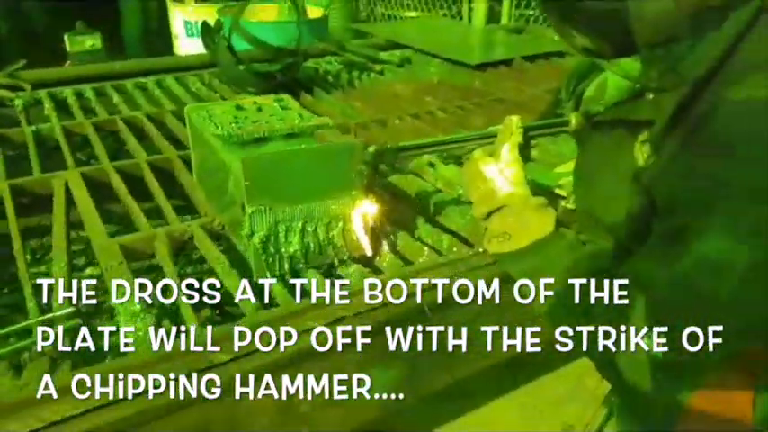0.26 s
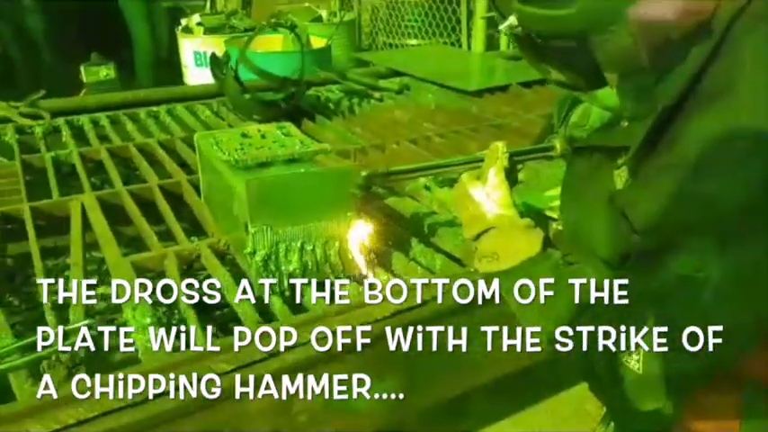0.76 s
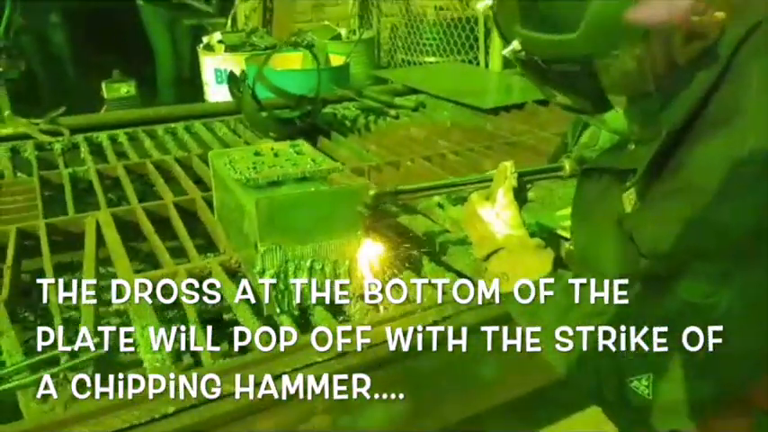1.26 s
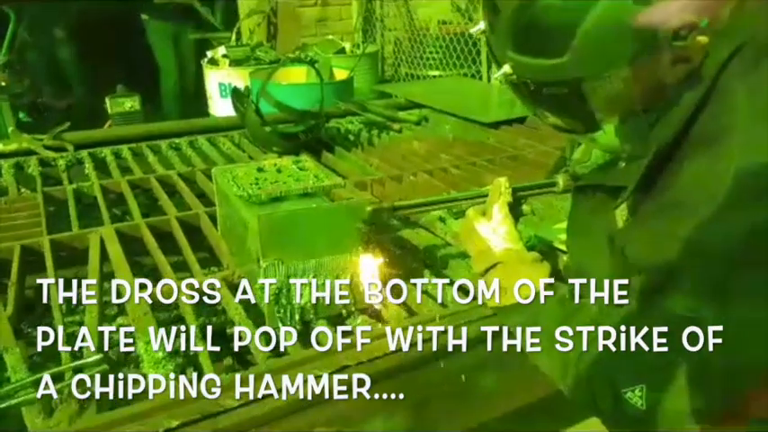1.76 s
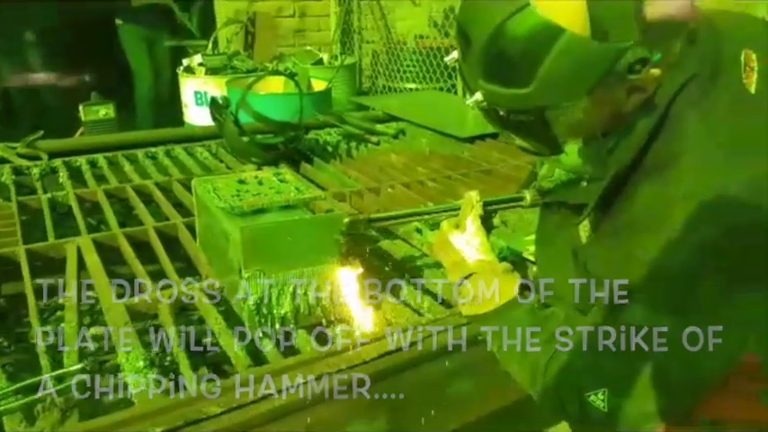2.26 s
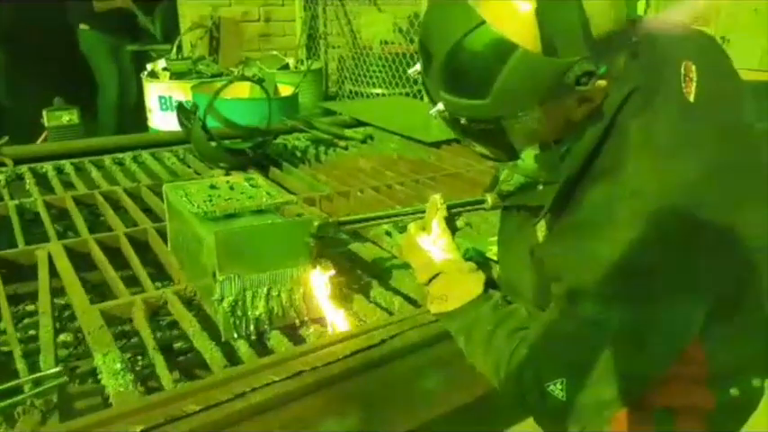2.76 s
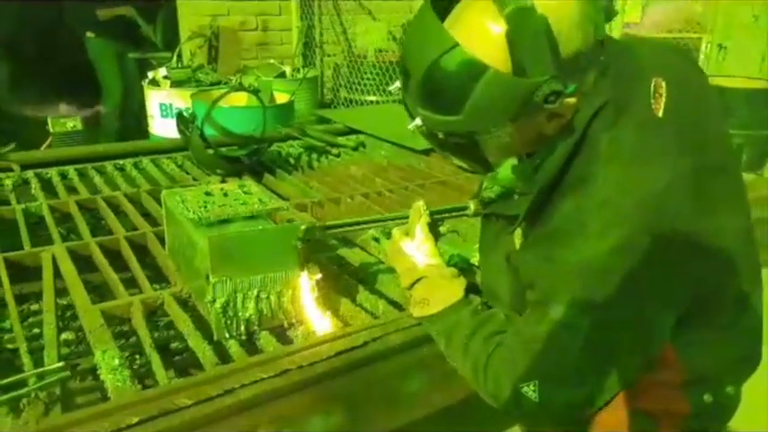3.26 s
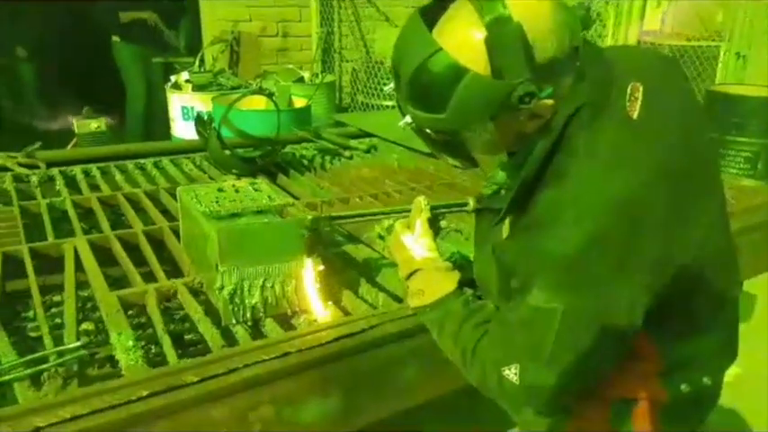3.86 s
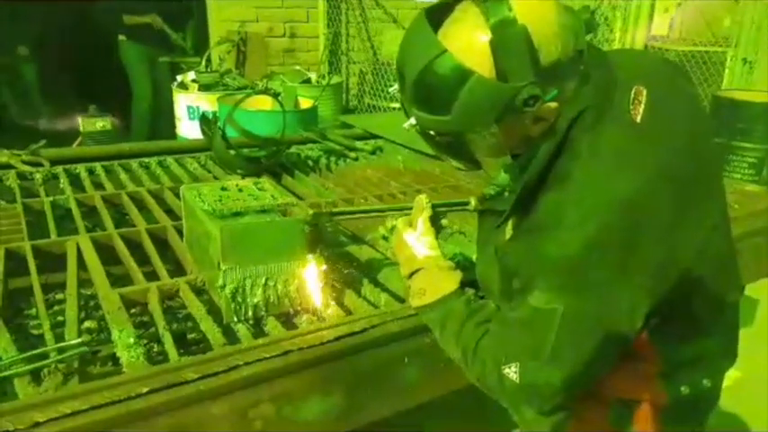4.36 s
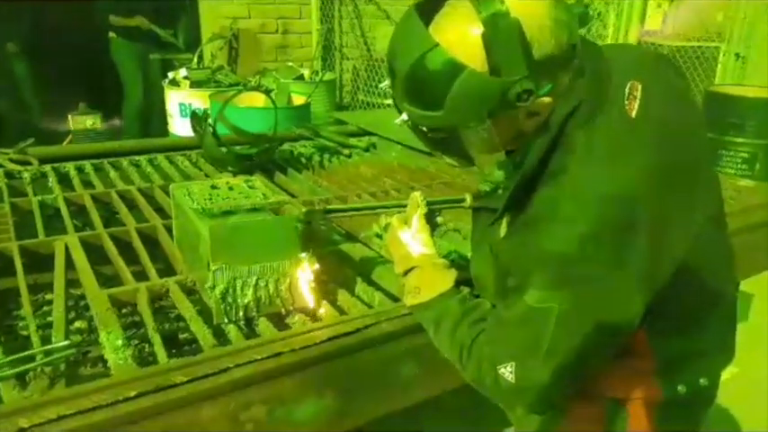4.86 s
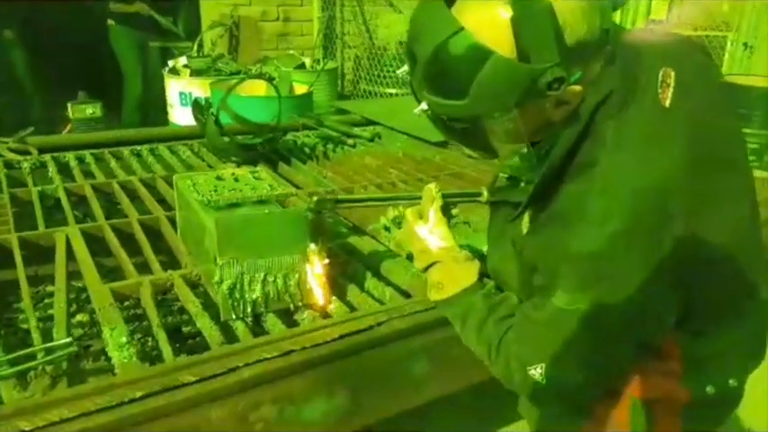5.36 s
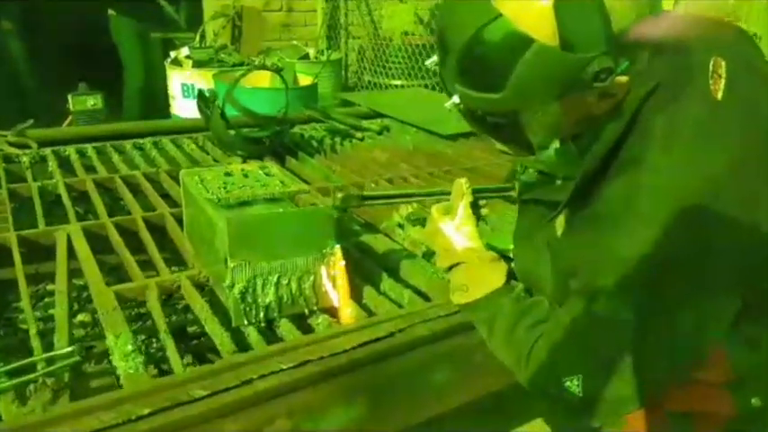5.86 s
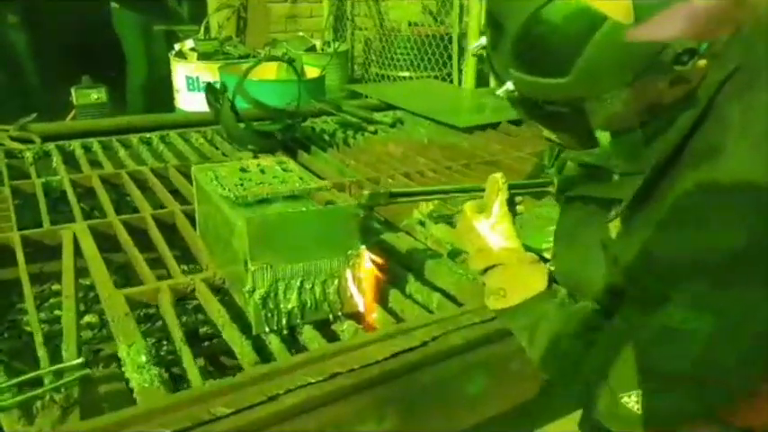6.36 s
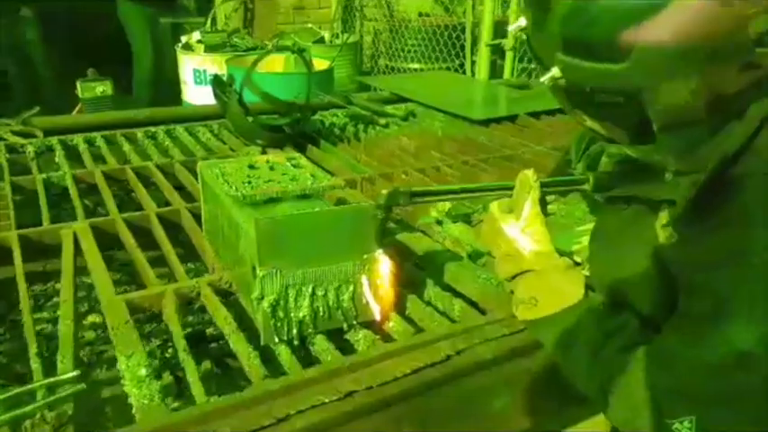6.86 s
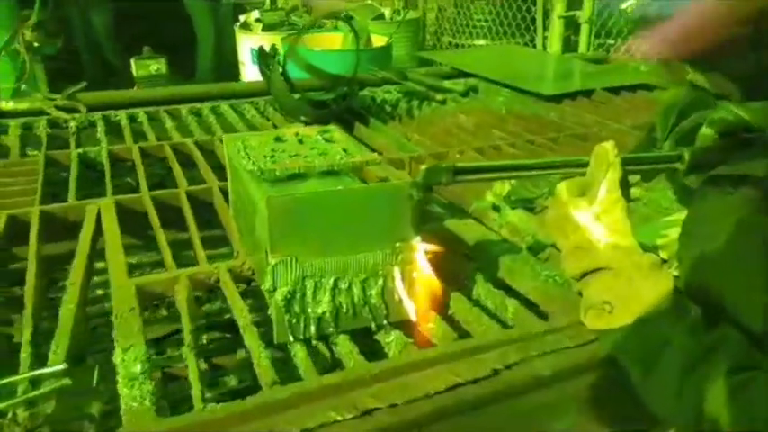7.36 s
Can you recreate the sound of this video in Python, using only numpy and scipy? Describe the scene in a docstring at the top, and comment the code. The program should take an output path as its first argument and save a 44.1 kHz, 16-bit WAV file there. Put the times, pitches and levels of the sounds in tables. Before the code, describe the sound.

From the start, a nearby gas torch cuts a steel block in a workshop, making a loud, bright, rushing hiss with a fine sputter. A half-whistling ring and a faint thin note run through it, over a low rumble that flares briefly at about 0.7 and 1.3 seconds. The jet is strongest from around 2.5 to 3.7 seconds, with two short high whistles near 3 seconds, slightly to the left. It then turns hollower and eases a little. At about 5.2 seconds the cutting jet shuts off abruptly, leaving a much quieter, airy flame. From roughly 5.7 seconds the flame swells against the steel into a low roar with hiss. Thin, high whistles at several pitches overlap, fading in and out, with a brief brighter one near 7.3 seconds. The flame is still roaring at the end, around 7.6 seconds.

```python
"""In a workshop, on a slatted table, an oxyacetylene torch cuts a steel block.
The turbulent oxygen jet hisses through the kerf and excites its air resonances; the sound turns
hollow by interference as the welder leans in. Once the lever is let go, only the preheat flame
burns: it roars against the steel, and thin edge tones come and go as the tip moves."""
import sys
import numpy as np
from scipy import signal
from scipy.fft import rfft, irfft, next_fast_len
from scipy.io import wavfile
from scipy.ndimage import map_coordinates

SR = 44100
rng = np.random.default_rng(int(sys.argv[2]) if len(sys.argv) > 2 else 0)


def generate_wav(sig):
    """Save sig (samples, or channels by samples) to the path in sys.argv[1] as 16-bit PCM at SR."""
    pcm = np.round(np.clip(np.atleast_2d(sig).T, -1, 1) * 32767).astype(np.int16)
    wavfile.write(sys.argv[1], SR, pcm)


N = 336042
BAND_LIMIT_HZ = 15520

# Strength of the jet in the kerf and at the tip: time_s, rush_db, hiss_db
JET_LEVELS = [(0.0, -28, -24.5), (0.45, -26, -25.5), (0.7, -24.5, -27), (0.9, -28, -28), (1.35, -25, -30),
              (1.85, -29.5, -28), (2.45, -21.5, -28.5), (2.7, -23.5, -24), (2.92, -23, -22.5),
              (3.15, -22.0, -28), (3.6, -22.0, -29.5), (4.085, -26, -27), (4.12, -31, -28.5),
              (4.33, -29.5, -31), (4.4, -29.0, -26), (4.9, -33, -31.5), (5.04, -29, -29.5),
              (5.14, -28, -39)]
# The jet's shrill band: time_s, centre_hz, level_db
SHRILL_BAND = [(0.0, 8600, -32.5), (1.36, 8750, -31.5), (1.79, 8680, -36.5), (2.1, 8400, -29),
               (2.83, 8160, -32.5), (3.75, 8650, -29.5), (3.9, 9050, -33.5), (4.3, 8900, -37),
               (5.1, 8500, -38)]
# The half-whistling ring of the cut: time_s, centre_hz, level_db
CUT_RING = [(0.0, 2740, -38), (0.65, 2680, -29), (1.0, 2720, -32), (1.35, 2717, -30.5), (1.72, 2720, -31),
            (1.82, 2720, -41), (2.22, 2734, -30.5), (2.5, 2764, -25), (2.85, 2816, -33.5),
            (3.15, 2798, -33), (3.55, 2783, -26.5), (4.09, 2760, -32.5), (4.14, 2760, -33.5),
            (4.85, 2765, -37.5), (5.12, 2740, -32)]
# Spectra of the jet's rush and hiss: frequency_hz, density_db
JET_RUSH_SPECTRUM = [(300, -57), (520, -16), (760, -3), (980, -7), (1250, 0.5), (1750, -1.5), (1930, -1),
                     (2200, 1.5), (2500, 2.5), (3150, 4.5), (3550, -1.5), (3900, -0.5), (4550, -2),
                     (5500, -0.5), (7100, -3.5), (9500, -5)]
JET_HISS_SPECTRUM = [(2500, -17), (4000, -6.5), (5500, -6.5), (7100, -4), (7550, -12), (9000, -0.5),
                     (9900, -1), (10800, 1), (13200, 3.5), (15000, 5.5), (16000, -5)]
def cutting_jet(hiss_pan_db):
    """Jet turbulence radiates broadband noise and drives the kerf; molten slag makes it sputter."""
    rush_db, hiss_db = curves(JET_LEVELS)
    shrill_hz, shrill_db = curves(SHRILL_BAND)
    ring_hz, ring_db = curves(CUT_RING)
    sputter_db = .35 * wobble(22) + .3 * wobble(70)
    kerf = kerf_resonances(rush_db)
    ring = amp(ring_db + 0.88 * wobble(24.97)) * panned(-6.5) * resonance(ring_hz, width_hz=74)
    rush_gain = amp(2.5 + 1.24 * wobble(48))
    rush = rush_gain * turbulence(JET_RUSH_SPECTRUM, echo_share=1.0, patch_hz=191, patch_s=0.78)
    hiss_gain = amp(hiss_db + 3.0 + 1.05 * wobble(32)) * panned(hiss_pan_db)
    hiss = hiss_gain * turbulence(JET_HISS_SPECTRUM, echo_share=0.82, patch_hz=345, patch_s=0.22)
    shrill_gain = amp(shrill_db + 3.5 + 1.14 * wobble(30)) * panned(2.7)
    shrill = shrill_gain * resonance(shrill_hz + 50 * wobble(9), width_hz=480)
    return amp(sputter_db) * (amp(rush_db) * (rush + kerf) + ring + hiss + shrill)


# Air modes in the kerf and under the block:
# centre_hz, width_hz, level_db, rush_slope (dB per dB), hollow_slope (dB per dB), pan_db
KERF_MODES = [(595, 88, -10, 0.05, 0.77, -0.5), (1242, 64, -17.5, 0, 0.7, -19),
              (1464, 73, -11, 0.15, 0.4, -21), (2208, 75, -18.5, -1, -0.5, 0),
              (2443, 47, -10.5, 1.1, 1.5, 6), (4030, 120, -12, -0.5, 0, 4), (4920, 220, -19, 1.9, -0.5, 17),
              (5386, 170, -13.5, -1, 1.3, 6), (6375, 290, -16, -0.5, 0.5, -2)]
# How strongly the space under the block rings: time_s, hollow_db
HOLLOWNESS = [(0.0, -5), (0.65, -2), (2.6, -2.5), (3.2, -0.5), (3.75, 1.5), (4.1, -2), (5.1, -2)]
def kerf_resonances(rush_db):
    """Cavity resonance: a harder rush favours some air modes, a softer one others."""
    hollow_db = curves(HOLLOWNESS)[0] + flare_db() / 2
    drive_db = rush_db + 25  # excess over the usual rush of -25 dB
    modes = 0
    for hz, width_hz, level_db, rush_slope, hollow_slope, pan_db in KERF_MODES:
        mode_db = level_db + rush_slope * drive_db + hollow_slope * hollow_db + 1.3 * wobble(30)
        modes += amp(mode_db) * panned(pan_db) * resonance(hz, width_hz)
    return modes


# Bands that fade or swell as the welder leans over the jet: centre_hz, width_hz, change_db
INTERFERENCE_BANDS = [(3560, 200, -3.5), (5300, 600, 3), (5860, 260, -9), (6300, 630, 4.5), (7200, 260, -4),
                      (9900, 450, -5)]
def lean_interference(jet):
    """Interference: as the welder leans in, sound paths cancel in some bands and add in others."""
    change = sum((amp(db) - 1) * signal.lfilter(*signal.iirpeak(hz, hz / width_hz, fs=SR), jet)
                 for hz, width_hz, db in INTERFERENCE_BANDS)
    return jet + swell(3.8, np.inf, fade_s=1.7) * change


FREE_AIR_RUSH_DB, FREE_AIR_HISS_DB = -45.5, -39.5
# What the flame adds as it plays on the steel: time_s, rush_db, hiss_db
FLAME_ON_STEEL = [(5.23, -50, -62), (5.64, -46.5, -57), (5.74, -40.5, -42), (5.87, -39.5, -40),
                  (6.36, -37, -36), (6.93, -33, -28), (7.38, -39.5, -34.5), (7.6, -38, -35)]
# Spectra of the flame's rush and hiss: frequency_hz, density_db
FLAME_RUSH_SPECTRUM = [(400, -11.5), (600, 9.5), (800, -3), (1200, 2), (2300, 1), (2700, 4), (3200, -0.5),
                       (3600, -4), (4150, -2), (5300, -25)]
FLAME_HISS_SPECTRUM = [(3000, -31), (4300, 3), (5400, 6), (6100, 0.5), (6600, 5.5), (7700, 4), (8850, 10),
                       (9400, 3), (10500, 5.5), (11800, 8), (12900, 7.5), (15400, 10)]
# Airy bands of the flame on the block's edge: start_s, end_s, centre_hz, width_hz, level_db, pan_db
EDGE_BANDS = [(5.1, 7.8, 1265, 90, -49.5, -7), (5.2, 6.6, 6030, 70, -48, -2),
              (6.698, 7.75, 4315, 60, -41, -5), (6.75, 7.25, 11860, 170, -36, 5),
              (6.55, 7.2, 8400, 50, -45, 2), (6.55, 7.1, 9630, 45, -45, 2)]
def preheat_flame(hiss_pan_db):
    """Incoherent sources add in power: the free flame's noise plus that of its impact on the steel."""
    rush_db, hiss_db = curves(FLAME_ON_STEEL)
    rush_level = np.hypot(amp(FREE_AIR_RUSH_DB), amp(rush_db + 5.5))
    hiss_level = np.hypot(amp(FREE_AIR_HISS_DB), amp(hiss_db + 1.0))
    rush = rush_level * turbulence(FLAME_RUSH_SPECTRUM, echo_share=1.0, patch_hz=120, patch_s=1.14)
    hiss_gain = hiss_level * amp(1.2 * wobble(12)) * panned(hiss_pan_db)
    hiss = hiss_gain * turbulence(FLAME_HISS_SPECTRUM, echo_share=1.0, patch_hz=150, patch_s=0.85)
    edge = sum(amp(db) * swell(start_s, end_s, fade_s=0.22) * panned(pan_db) * resonance(hz, width_hz)
               for start_s, end_s, hz, width_hz, db, pan_db in EDGE_BANDS)
    tones = (hiss_level / amp(FREE_AIR_HISS_DB)) ** 0.54 * tip_tones()  # 0.54 dB per dB of hiss
    return amp(0.93 * wobble(11)) * (rush + hiss + edge + tones)


# Loud whistles of the tip: start_s, end_s, pitch_hz, level_db, pan_db, stereo_phase_rad
TIP_WHISTLES = [(2.87, 3.017, 4195, -29, -10, 1.4), (3.12, 3.29, 4195, -29, -13, 1.4),
                (5.69, 6.2, 2789, -38.5, -14, 2.2), (6.12, 6.38, 2789, -36, -1, 2.6),
                (6.02, 6.7, 3025, -42, -12, 2), (5.9, 6.7, 4035, -44, -6, 2.1),
                (5.95, 6.4, 11693, -42, 12, 1.5), (6.04, 6.7, 8694, -38.5, 0, 0.4),
                (6.005, 6.085, 6056, -37.5, 4, 0.2), (6.18, 6.55, 6056, -31, 10, 0.2),
                (6.58, 6.97, 5150, -35.5, 0, 0.3), (6.68, 7.3, 4198, -35.5, -16, 0.86),
                (6.68, 7.18, 4167, -33.5, -13, 0.6), (7.27, 7.45, 4195, -30.5, -2, 1.65),
                (6.7, 7.1, 4496, -40, -14, 0.8), (6.68, 7.3, 6175, -38.5, 1, 1.7),
                (6.7, 7.2, 7230, -44, 9, 2.3), (6.7, 7.7, 9400, -45, 4, 1.5),
                (6.75, 7.52, 11090, -38.5, 2.5, 1.3), (7.21, 7.38, 11100, -31.5, 1, 1.8),
                (6.75, 7.5, 5580, -44, -1, 1.3), (7.26, 7.8, 4800, -39, 4, 0.4),
                (7.24, 7.8, 5135, -43, 3, 0.5)]
def tip_whistles():
    """Flow feedback: as the torch moves, edge tones take hold and give way, the long ones slowly."""
    whistles = 0
    for start_s, end_s, hz, level_db, pan_db, phase_rad in TIP_WHISTLES:
        envelope = swell(start_s, end_s, fade_s=0.66 * (end_s - start_s))
        tone = edge_tone(hz, stray_hz=7.0, airy_db=-4.0, stereo_phase_rad=phase_rad)
        whistles += amp(level_db) * envelope * panned(pan_db) * tone
    return whistles


# Strength of the burning gas's roar: time_s, level_db
ROAR_LEVELS = [(0.0, -39), (2.0, -40.5), (2.22, -37), (3.86, -38), (4.18, -43.5), (4.79, -47.5),
               (5.42, -44), (5.85, -34), (7.09, -34), (7.58, -30.5)]
# Spectrum of the roar: frequency_hz, density_db
ROAR_SPECTRUM = [(12, -48), (20, -17), (91, -1), (129, 1), (255, 1), (310, -3.5), (410, -4), (550, -3),
                 (800, -8.5), (1040, -22.5), (1760, -120)]
def combustion_roar():
    """Combustion noise: burning gas rumbles against the steel, nearly alike on both sides."""
    roar_db, = curves(ROAR_LEVELS)
    rumble = turbulence(ROAR_SPECTRUM, echo_share=0.31, patch_hz=200, patch_s=0.23)
    return amp(roar_db + 1.5 + flare_db()) * rumble


# Brief flares of the flame: time_s, boost_db
FLAME_FLARES = [(0.71, 6), (1.31, 5), (3.26, 1.5), (5.97, 2.5)]
def flare_db(half_length_s=0.062):
    """Unsteady burning: each flare lifts the level in a Gaussian pulse."""
    return sum(db * np.exp(-((clock() - time_s) / half_length_s) ** 2) for time_s, db in FLAME_FLARES)


# Swell and ebb of the gas tone: time_s, level_db
GAS_TONE_LEVELS = [(0.0, -48), (1.25, -45), (1.38, -43), (1.7, -44), (1.85, -56), (2.2, -53), (2.62, -36),
                   (3.0, -46), (5.17, -51.5), (5.26, -47), (5.42, -45), (5.47, -53), (5.61, -54),
                   (5.71, -45), (5.85, -50), (6.15, -54), (6.35, -40.5), (6.62, -39), (6.75, -47)]
def gas_tone():
    """Flow-induced oscillation: gas passing through the torch sings one thin, fairly clean note."""
    level_db, = curves(GAS_TONE_LEVELS)
    return amp(level_db) * panned(-3) * edge_tone(hz=1828, stray_hz=4, airy_db=-7)


# Faint tones of the tip with the flame in free air: pitch_hz, level_db, pan_db
FAINT_TONES = [(4204, -49.5, -5), (4520, -56, -3), (4790, -53, -2), (6130, -49.5, 4), (8915, -50.5, -2),
               (11105, -54, 0)]
def tip_tones(drift_db=1.3):
    """Weak edge tones, more air noise than pitch, each drift in level independently."""
    return sum(amp(db + drift_db * wobble(3.6)) * panned(pan_db)
               * edge_tone(hz, stray_hz=10.97, airy_db=5.0) for hz, db, pan_db in FAINT_TONES)


def edge_tone(hz, stray_hz, airy_db, stereo_phase_rad=1.2):
    """Self-sustained oscillation: a core of straying pitch in a skirt of air noise, rms near 1."""
    phase = 2 * np.pi * np.cumsum(hz + stray_hz * wobble(30)) / SR
    offset = stereo_phase_rad + wobble(1.976) / 3  # the path difference to the microphones drifts
    core = unit(np.cos([phase, phase + offset])) * amp(2.5 * wobble(32))
    air = amp(airy_db) * resonance(hz, width_hz=22, skirt=8.7)
    return (core + air) / np.hypot(1, amp(airy_db))


def resonance(hz, width_hz, skirt=1, size=32768):
    """A noise-driven resonator rings in a narrow band, rms 1; a wide skirt makes it airy."""
    detune = np.fft.fftfreq(size, N / SR / size) / width_hz
    drive = rng.standard_normal((2, size, 2)) @ [1, 1j]
    ringing = np.fft.ifft(drive / ((1 + 1j * detune) * (1 + 1j * detune / skirt)))
    envelopes = np.array([np.interp(np.arange(N) * size / N, np.arange(size), r) for r in ringing])
    carrier = np.exp(2j * np.pi * np.cumsum(hz * np.ones(N)) / SR)
    return unit(stereo_pair((envelopes * carrier).real, np.mean(hz)))


# Left-right balance of the turbulent noise: frequency_hz, pan_db
STEREO_BALANCE = [(100, -3), (400, -2), (750, 1), (1100, -10.5), (1600, -2), (2100, -2), (4200, -4),
                  (5200, 0.5), (7700, 3), (10000, 0.5)]
def turbulence(spectrum, echo_share, patch_hz, patch_s):
    """Comb filtering: echoes off the slats leave drifting patches in the treble of flow noise, rms 1."""
    hz, time_s, noise = signal.stft(rng.standard_normal((3, N)), SR, nperseg=1024)
    across_bands = np.fft.fftfreq(len(hz), hz[1])[:, None] * patch_hz
    across_time = np.fft.fftfreq(len(time_s), time_s[1]) * patch_s
    scatter = rng.standard_normal((2, len(hz), len(time_s), 2)) @ [1, 1j]
    combs = unit(np.fft.ifft2(scatter * np.exp(-across_bands ** 2 - across_time ** 2)))
    share = (echo_share * hz ** 2 / (hz ** 2 + 2600 ** 2))[:, None]  # long waves pass the slats
    combed = np.sqrt(1 - share) * noise[:2] + np.sqrt(share) * combs * noise[2]
    in_band = hz < BAND_LIMIT_HZ + hz[2]
    colour = amp(along(spectrum, hz)) * panned(along(STEREO_BALANCE, hz)) * in_band
    _, sound = signal.istft(stereo_pair(combed, hz[:, None]) * colour[:, :, None], SR, nperseg=1024)
    return unit(sound[:, :N])


# Likeness of the sound at the two microphones: frequency_hz, correlation
STEREO_CORRELATION = [(100, .97), (600, .95), (850, .7), (1150, -.4), (1600, -.3), (2100, -.65), (2450, 0),
                      (2700, .1), (15000, 0)]
def stereo_pair(noises, hz):
    """Spatial coherence: two noises, mixed as mid and side, set how alike left and right are."""
    angle = np.arccos(along(STEREO_CORRELATION, hz)) / 2
    mid, side = noises[0] * np.cos(angle), noises[1] * np.sin(angle)
    return np.array([mid + side, mid - side])


def panned(pan_db):
    """Constant-power gains; pan_db is the left level minus the right."""
    pair = amp(np.array([np.atleast_1d(pan_db), -np.atleast_1d(pan_db)]) / 2)
    return pair / np.sqrt(np.mean(pair ** 2, axis=0))


def swell(start_s, end_s, fade_s):
    """A raised-cosine rise around start_s and fall around end_s."""
    inside = np.minimum(clock() - start_s, end_s - clock()) / fade_s
    return .5 + .5 * np.sin(np.pi * np.clip(inside, -.5, .5))


def wobble(rate_hz):
    """A smooth random curve with rate_hz knots a second."""
    knots = rng.standard_normal(1024)
    coarse_s = clock()[::64]
    return np.interp(clock(), coarse_s, map_coordinates(knots, [coarse_s * rate_hz], mode="wrap"))


def curves(rows):
    """One value per sample for each column after the time."""
    time_s, *columns = np.transpose(rows)
    return [np.interp(clock(), time_s, column) for column in columns]


def along(points, hz):
    """Interpolation on a logarithmic frequency axis."""
    point_hz, values = np.transpose(points)
    return np.interp(np.log(hz + 1), np.log(point_hz + 1), values)


def amp(db):
    """Decibels to gain."""
    return 10 ** (np.asarray(db) / 20)


def unit(x):
    """Scaled to rms 1."""
    return x / np.sqrt(np.mean(np.abs(x) ** 2) + 1e-20)


def clock():
    """The time of every sample, in seconds."""
    return np.arange(N) / SR


LEVER_RELEASE_S, LEVER_CLOSING_S = 5.178, 0.022
# Where the hiss of jet and flame sits: time_s, pan_db
HISS_POSITION = [(0.0, 2.5), (1.74, 0.5), (2.6, 3.0), (3.89, -0.5), (5.06, 6.5), (5.57, 0), (6.27, 2),
                 (7.6, 0.5)]
def scene():
    """Superposition: the lever shuts off the jet, which yields to the flame over tones and roar."""
    oxygen = .5 - .5 * np.tanh((clock() - LEVER_RELEASE_S) / (2 * LEVER_CLOSING_S))
    hiss_pan_db, = curves(HISS_POSITION)
    jet = oxygen * lean_interference(cutting_jet(hiss_pan_db))
    flame = np.sqrt(1 - oxygen ** 2) * preheat_flame(hiss_pan_db)  # constant-power crossfade
    return jet + flame + tip_whistles() + gas_tone() + combustion_roar()


def record(dry):
    """An ideal low-pass filter passes nothing above the band limit."""
    size = next_fast_len(N + SR // 2)
    in_band = np.fft.rfftfreq(size, 1 / SR) < BAND_LIMIT_HZ
    return irfft(rfft(dry, size) * in_band, size)[:, :N]


dry = scene()
out = record(dry)
generate_wav(out)
```